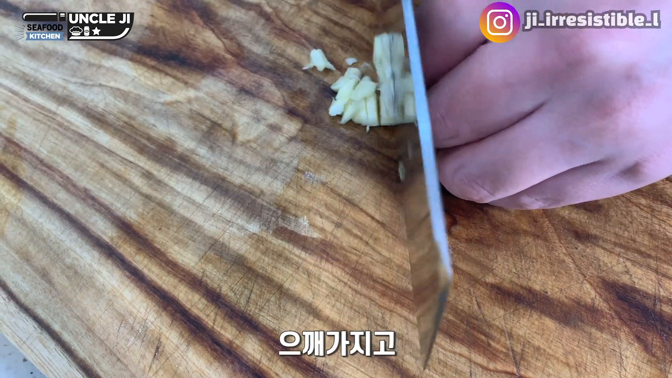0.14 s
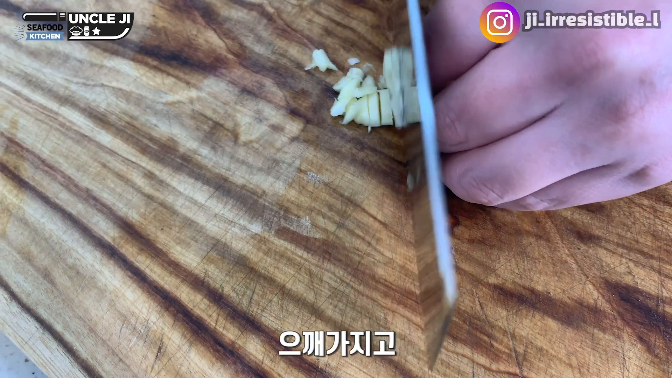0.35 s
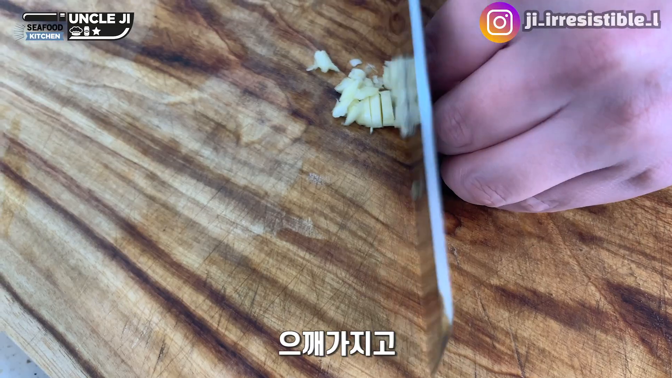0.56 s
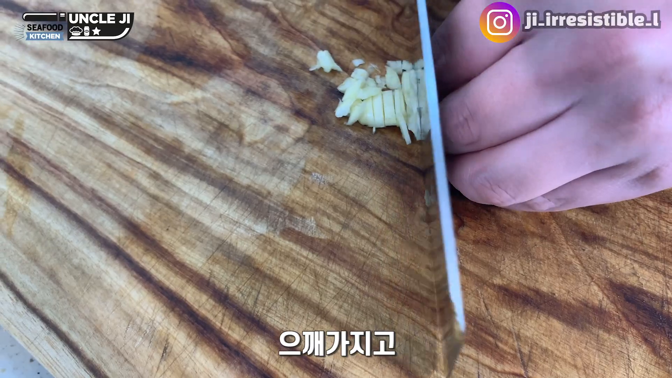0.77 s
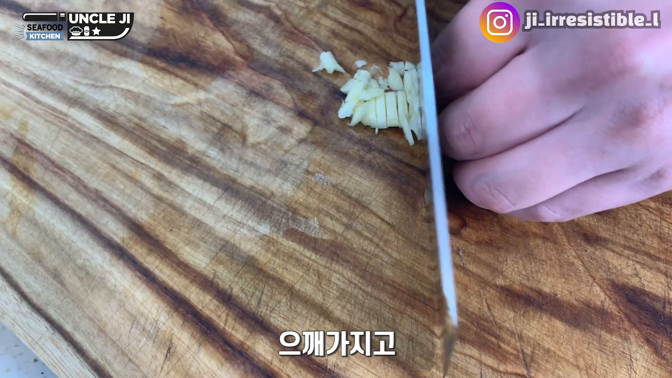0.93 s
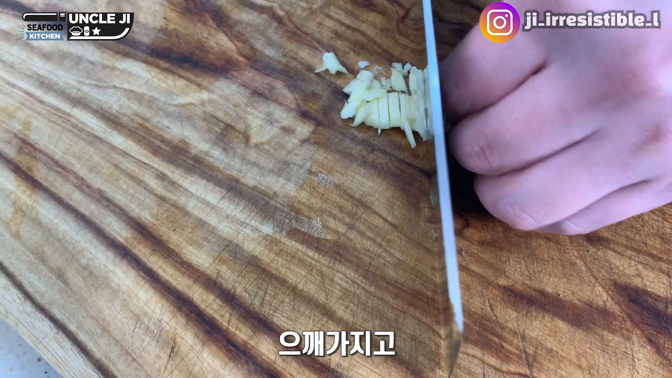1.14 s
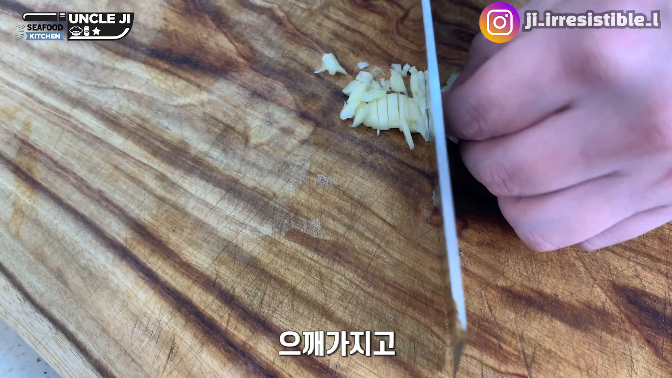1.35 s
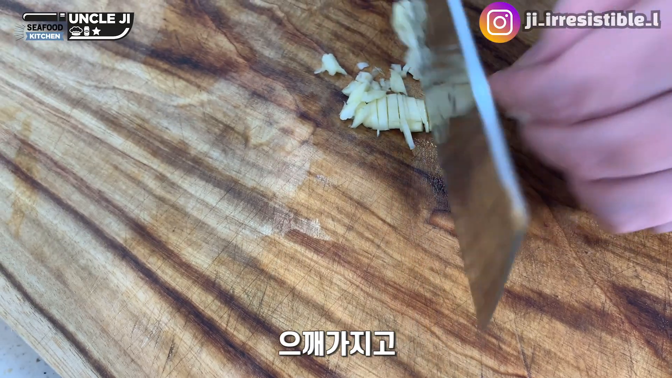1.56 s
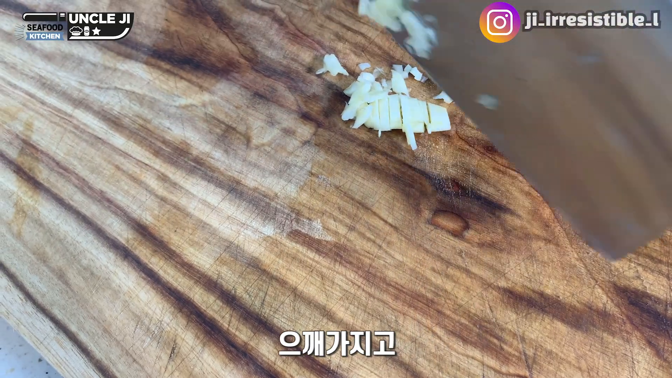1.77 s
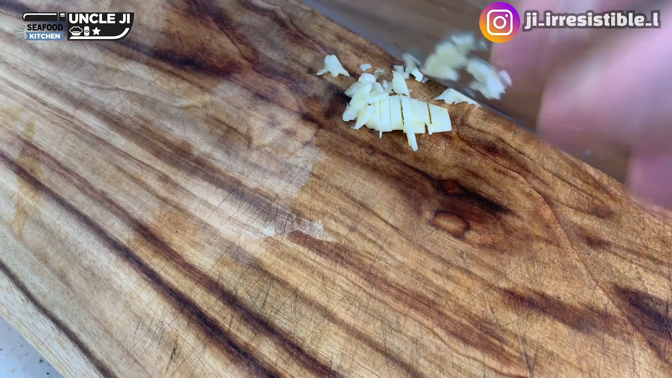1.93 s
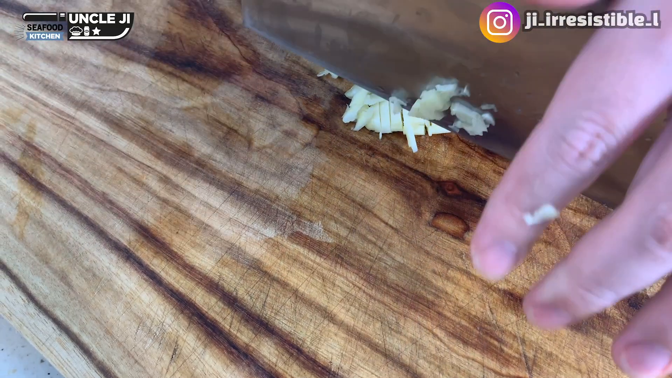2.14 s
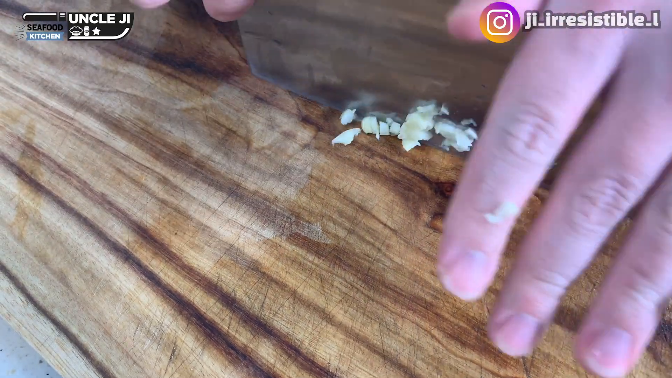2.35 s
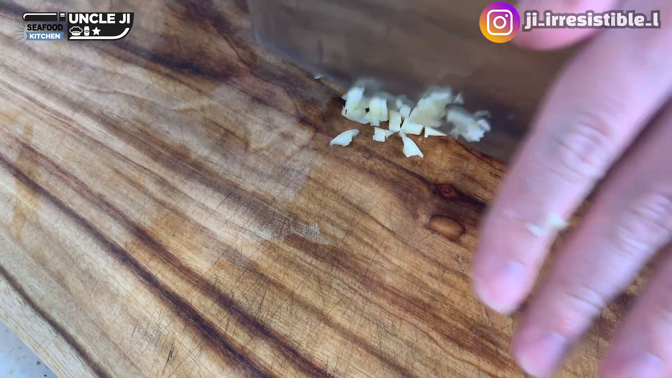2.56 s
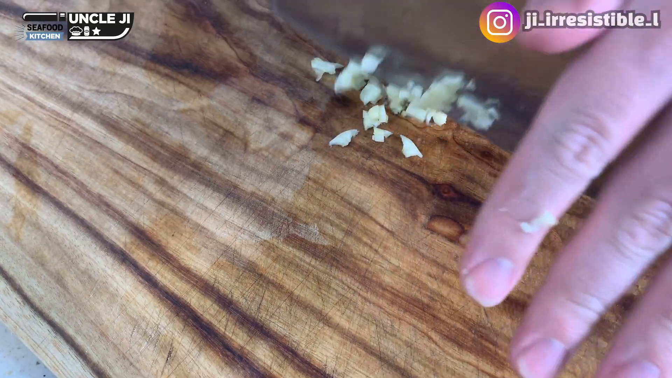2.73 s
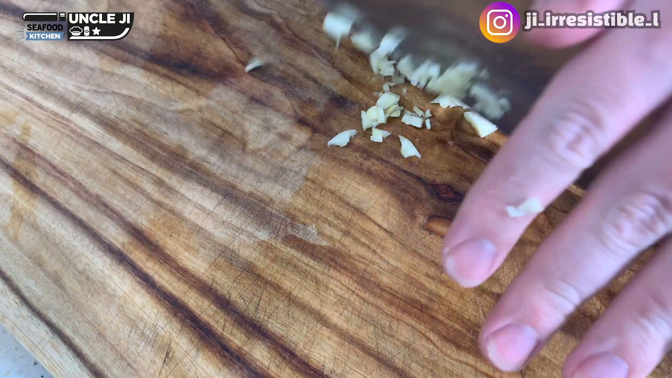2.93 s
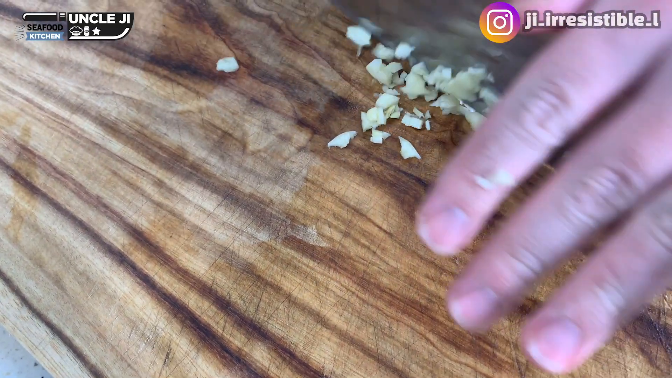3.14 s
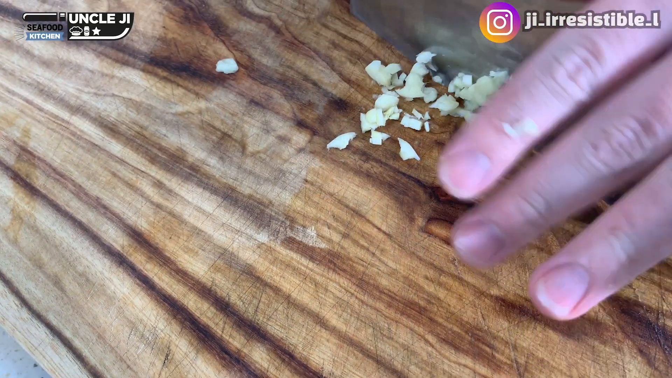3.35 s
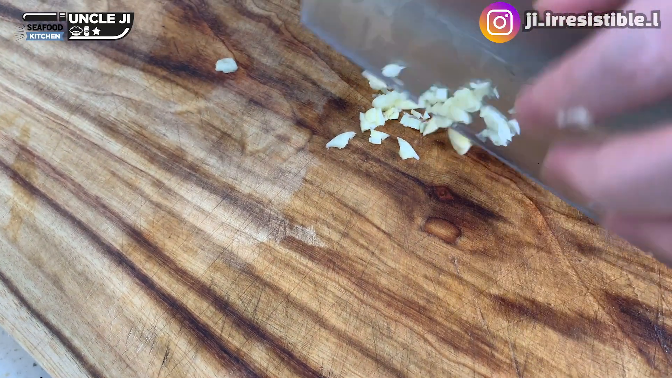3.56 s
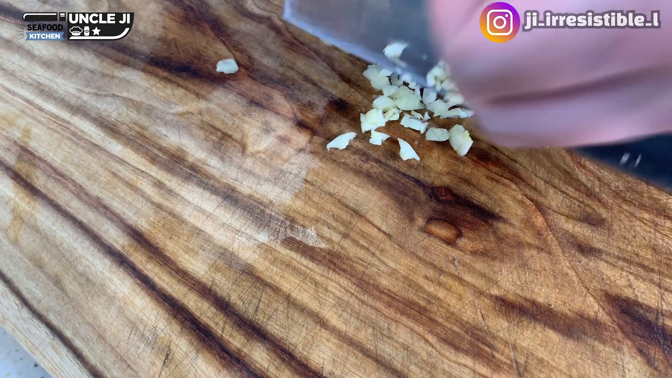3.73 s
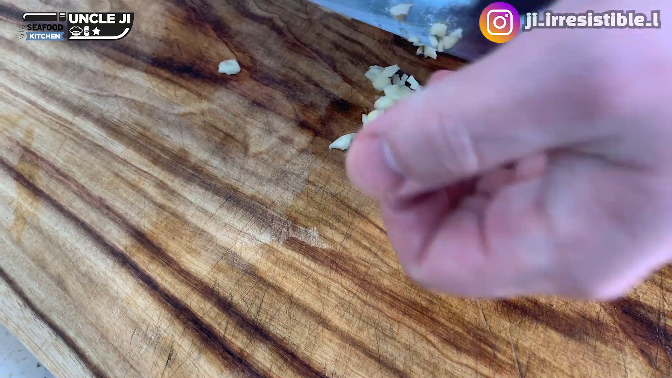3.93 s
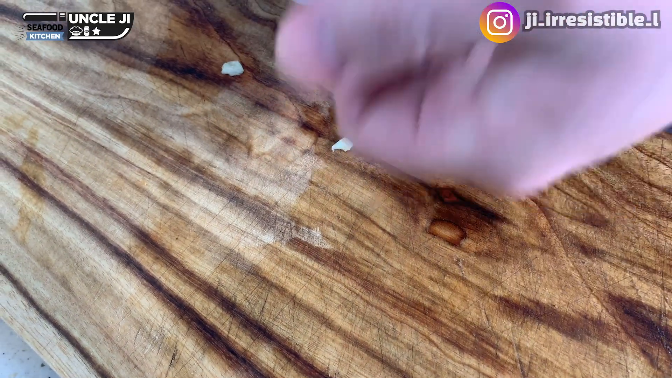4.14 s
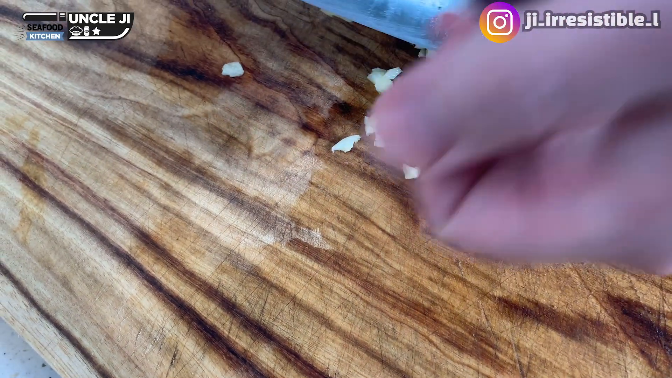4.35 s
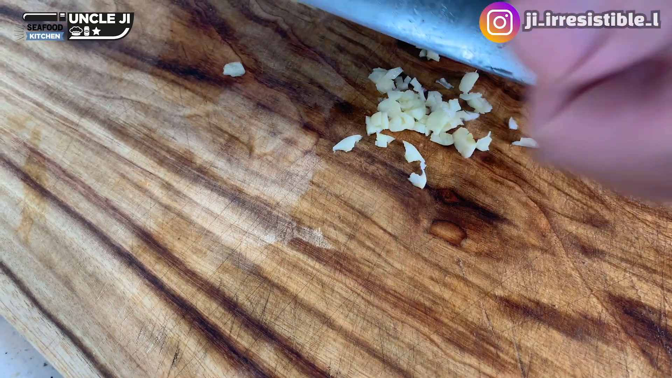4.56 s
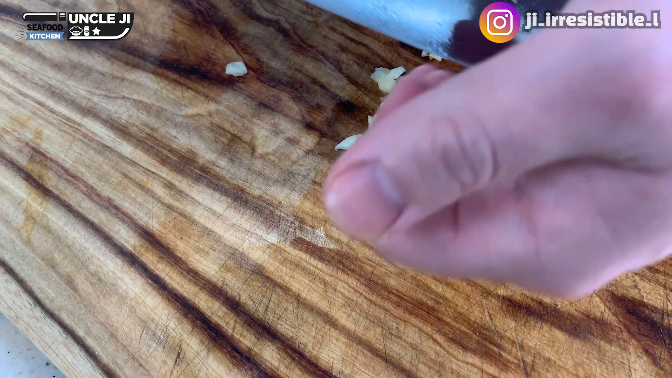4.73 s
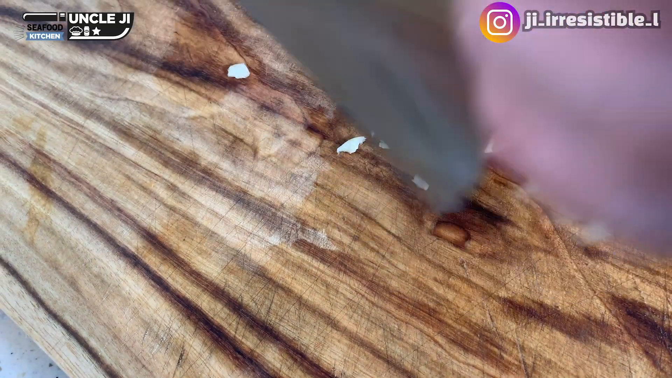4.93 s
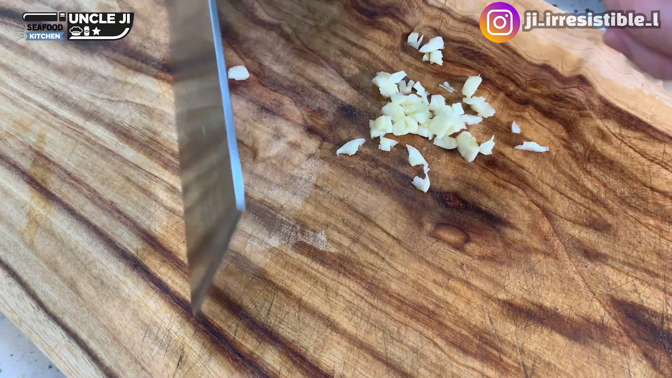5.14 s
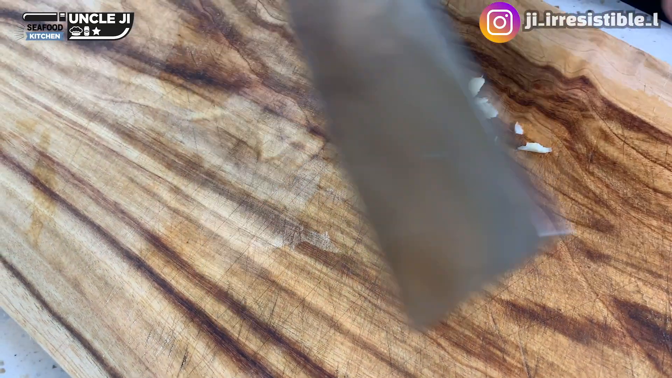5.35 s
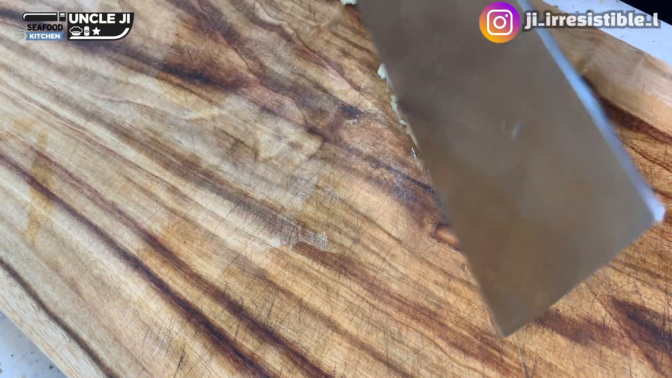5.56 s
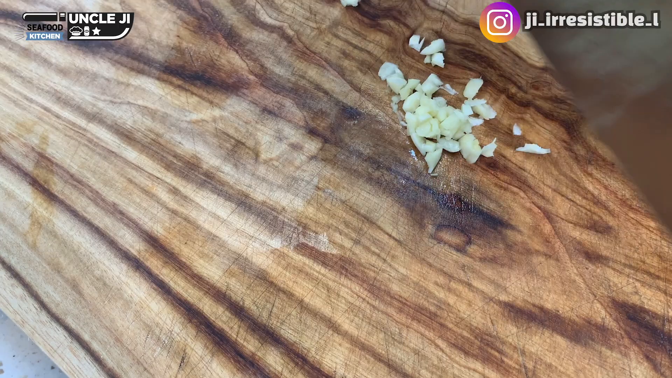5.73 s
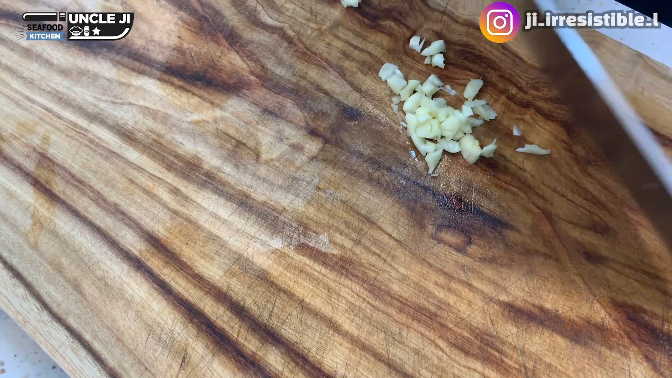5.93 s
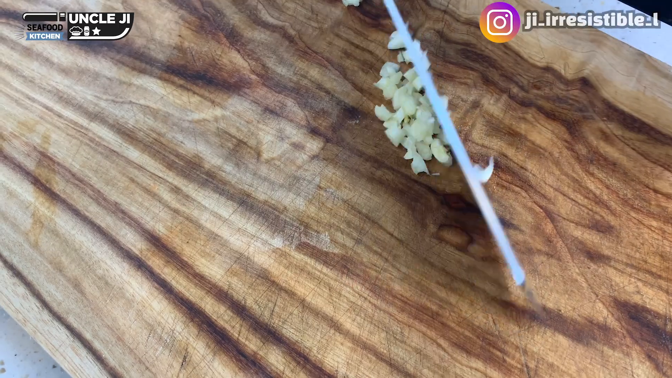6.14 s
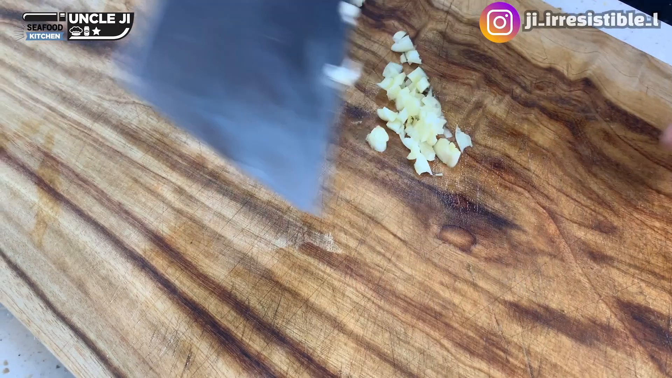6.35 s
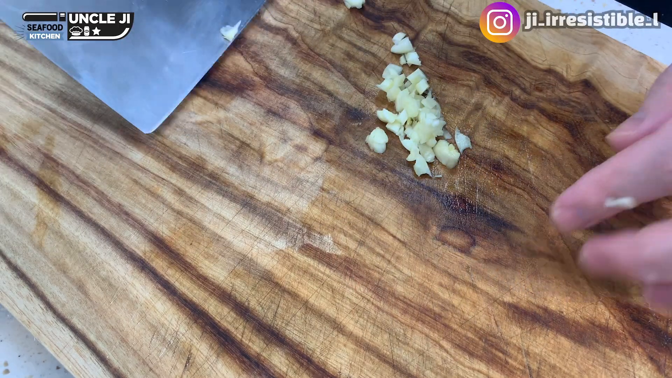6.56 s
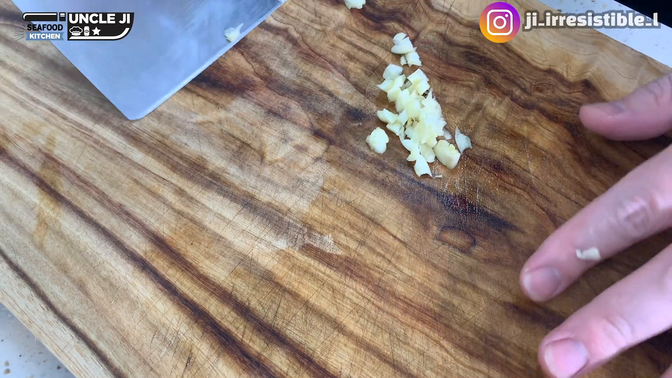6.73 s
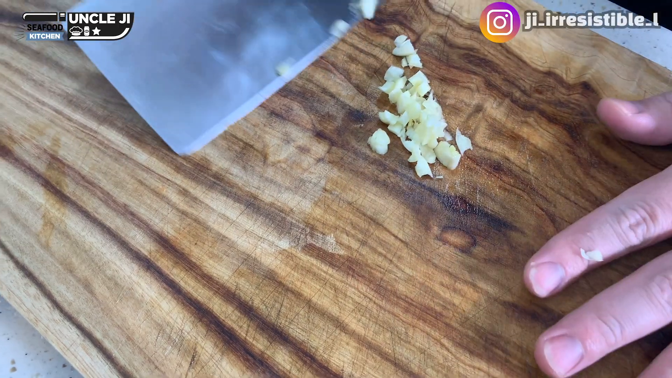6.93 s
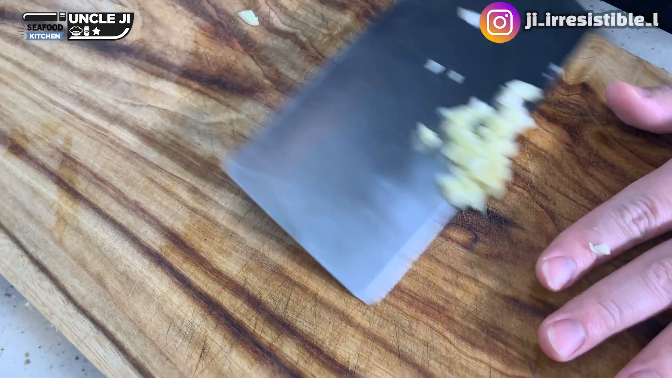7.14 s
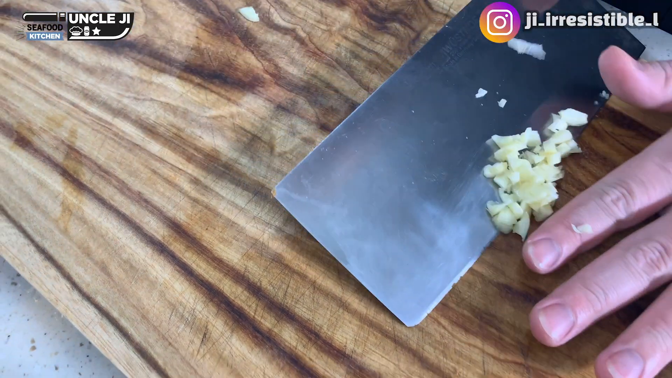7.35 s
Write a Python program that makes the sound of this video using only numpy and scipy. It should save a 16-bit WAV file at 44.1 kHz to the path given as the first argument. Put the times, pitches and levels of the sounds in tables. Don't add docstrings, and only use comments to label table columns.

```python
import sys
import numpy as np
from scipy import signal
from scipy.fft import rfft, irfft, next_fast_len
from scipy.io import wavfile
from scipy.ndimage import uniform_filter1d, map_coordinates

SR = 44100
rng = np.random.default_rng(int(sys.argv[2]) if len(sys.argv) > 2 else 0)


def bounce(signal):
    frames = np.transpose(np.atleast_2d(signal))
    limited = np.clip(frames, -1, 1)
    pcm = np.round(limited * 32767).astype(np.int16)
    wavfile.write(sys.argv[1], SR, pcm)


def boost_factor(decibels):
    exponent = np.asarray(decibels, float) / 20
    return 10 ** exponent


N = 330155
TIME_S = np.arange(N) / SR


def unit(x):
    return x / np.sqrt(np.mean(x ** 2) + 1e-20)


def along(points, hz):
    table = np.transpose(points)
    return np.interp(np.log(hz + 1), np.log(table[0] + 1), table[1])


def wobble(rate_hz):
    knots = rng.standard_normal(int(N * rate_hz / SR) + 4)
    return map_coordinates(knots, [np.arange(N) * rate_hz / SR])


def filtered(x, response):
    size = next_fast_len(len(x) + 8192)
    return irfft(rfft(x, size) * response(np.fft.rfftfreq(size, 1 / SR)), size)[:len(x)]


def coloured(x, curve):
    return filtered(x, lambda f: boost_factor(along(curve, f)))


def resonance(hz, width_hz):
    return lambda f: 1j * f * width_hz / (hz * hz - f * f + 1j * f * width_hz)


def add(track, start_s, sound):
    at = round(start_s * SR)
    part = track[max(at, 0):at + len(sound)]
    part += sound[max(-at, 0):][:len(part)]


def ramp(x):
    return np.sin(np.pi / 2 * np.minimum(x, 1)) ** 2


def ring(modes, t, spread_db):
    total = 0
    for k, (hz, db, t60_s) in enumerate(modes):
        decay = boost_factor(db + spread_db * rng.standard_normal() - 60 * t / t60_s)
        total = total + (-1) ** k * decay * np.sin(2 * np.pi * hz * t)
    return total


def grains(lump_db):
    return unit(rng.standard_normal(N) * boost_factor(lump_db * rng.exponential(size=N)))


# (frequency [Hz], t60 [s])
ROOM_T60 = [(60, 0.41), (160, 0.6), (420, 0.61), (1100, 0.47), (2000, 0.53), (3000, 0.41), (7700, 0.6),
            (16000, 0.15)]


def tail(colour):
    hz, t, z = signal.stft(rng.standard_normal(SR * 3 // 4), SR, nperseg=512)
    z = z * boost_factor(-60 * t / along(ROOM_T60, hz)[:, None])
    answer = coloured(signal.istft(z, SR, nperseg=512)[1], colour)
    answer_s = np.arange(len(answer)) / SR
    answer = answer * (1 - np.exp(-(answer_s / .009) ** 2))
    return answer / np.linalg.norm(answer)


# (frequency [Hz], density [dB per Hz])
AIR_SPECTRUM = [(15, -32.5), (25, -11), (53, 2.5), (76, -12.5), (92, -1.5), (124, -9.5), (154, 4.5),
                (176, -8), (719, -15), (823, -15), (1340, -23), (1490, -26.5), (2370, -24), (14900, -54),
                (16200, -49)]
# (frequency [Hz], level [dB rms])
FRIDGE_LINES = [(48.4, -69.5), (150.7, -71.5), (613.7, -83.5), (710.6, -76.5), (1303, -80.5), (1405, -85),
                (1604, -90), (2320, -85)]


def fridge():
    noise = rng.standard_normal(N)
    air = boost_factor(-58.5 + .8 * wobble(3)) * unit(coloured(noise, AIR_SPECTRUM))
    hum = np.zeros(N)
    for hz, db in FRIDGE_LINES:
        level = boost_factor(db + 3 + 2 * wobble(6))
        hum += level * np.sin(2 * np.pi * hz * TIME_S + 1.5 * wobble(4))
    whine = boost_factor(-84) * unit(filtered(rng.standard_normal(N), resonance(2340, 30)))
    return air + hum + whine


# (time [s], peak [dB], pitch [Hz])
SNAPS = [(0.1439, -20, 8000), (1.468, -48, 5030), (2.7907, -42, 6930), (3.224, -58, 9240),
         (3.344, -50.5, 3200), (4.116, -54.5, 8950), (4.446, -49.5, 3400), (4.572, -42, 1394),
         (5.126, -39, 5060), (5.439, -48, 8220)]


def ticks():
    out, t = np.zeros(N), np.arange(SR // 50) / SR
    for start_s, db, hz in SNAPS:
        add(out, start_s, boost_factor(db) * np.sin(2 * np.pi * hz * t) * np.exp(-t * hz / 0.78))
    return out


# (time [s], pressure [dB], speed [dB], blade mode nearest the contact [Hz])
DRAGS = [
    [(5.15, -46.5, -58, 1300), (5.188, -35.5, -43, 1610), (5.234, -27, -38.5, 1740),
     (5.256, -39, -37.5, 1620), (5.294, -36.5, -38, 1870), (5.322, -32.5, -45.5, 1360),
     (5.342, -34, -45.5, 1315), (5.398, -51, -64, 1280), (5.44, -56.5, -69, 1560)],
    [(5.82, -40.5, -52.5, 1500), (5.85, -39, -44, 1940), (5.902, -40, -37.5, 2030), (5.91, -36, -37, 1890),
     (5.964, -33.5, -41, 1820), (5.986, -43.5, -51, 1720), (6.03, -57, -64, 1680)],
    [(6.76, -47.5, -57.5, 1550), (6.782, -41.5, -55.5, 1510), (6.854, -40, -52.5, 1530),
     (6.908, -41, -59, 1440), (6.934, -34, -55, 1460), (7.004, -43.5, -53, 1470), (7.044, -35.5, -53, 1580),
     (7.126, -43.5, -57, 1410), (7.2, -62.5, -75, 1560)],
]
# (board rumble [dB], favoured board mode [Hz], favoured edge mode [Hz], hiss [dB])
DRAG_LEAN = [
    (3.5, 130, 3300, -0.5),
    (-4, 87, 3380, 1),
    (-2, 210, 3400, -4),
]
# (frequency [Hz], width [Hz], level [dB])
BLADE_MODES = [(560, 45, -8), (680, 45, -3), (880, 40, -4), (1080, 40, -7), (1300, 35, -2), (1460, 40, -2),
               (1650, 35, -1), (1830, 30, -3), (2000, 45, -7), (2220, 45, -8)]
EDGE_MODES = [(2470, 150, 4.5), (2950, 93, 11.5), (3200, 120, 8), (3510, 80, 3), (3800, 59, 4),
              (4420, 110, -4), (4870, 670, -19)]
WOOD_MODES = [(175, 12, 5.5), (335, 50, -12.5), (405.2, 60, 2)]
# (frequency [Hz], density [dB per Hz])
HISS_SPECTRUM = [(3000, -24), (4800, -2), (5600, -5), (6900, 0), (8400, -9), (10000, -14), (12000, -11),
                 (14900, -6), (16200, -12)]
HISS_DB, HISS_GROWS = -44.5, 1.1
RUMBLE_DB, RUMBLE_FADES = -9.5, .5
WOOD_FOLLOWS = 2.2
RASP_DB, GRIT_DB = -6.5, -8.5


def scrapes():
    fade = np.array([.06, -40, -40, 0])
    rows, starts_s = [], []
    for stroke in map(np.array, DRAGS):
        rows += [stroke[0] + fade * [-1, 1, 1, 0], stroke, stroke[-1] + fade]
        starts_s.append(stroke[0][0] - fade[0])
    rows = np.vstack(rows)
    press_db, speed_db, blade_hz = [np.interp(TIME_S, rows[:, 0], c) for c in rows[:, 1:].T]
    stroke_now = np.maximum(np.searchsorted(starts_s, TIME_S) - 1, 0)
    lean_db, lean_hz, edge_hz, shine_db = np.array(DRAG_LEAN)[stroke_now].T
    fast_db = speed_db + 40
    wood_hz = np.clip(lean_hz * (blade_hz / 1450) ** WOOD_FOLLOWS, 170, 420)
    rub = grains(lump_db=1.2) * boost_factor(1.5 * wobble(60))

    def mode(hz, width_hz):
        sharp, broad = resonance(hz, .7 * width_hz), resonance(hz, .7 * hz)
        return filtered(rub, lambda f: sharp(f) * broad(f))

    def sing(modes, peak_hz, reach):
        total = np.zeros(N)
        for hz, width_hz, db in modes:
            near_db = 8.5 * np.exp(-(np.log(hz / peak_hz) / reach) ** 2) + 3.5 * wobble(13)
            total += boost_factor(db) * boost_factor(near_db) * mode(hz, width_hz)
        return total / np.sqrt(np.abs(uniform_filter1d(total * total, SR // 10)) + 1e-12)

    def scratch(hz, width_hz):
        return unit(filtered(rub, lambda f: resonance(hz, width_hz)(f) ** 2))

    blade = boost_factor(press_db - 2.5) * sing(BLADE_MODES, blade_hz, reach=.07)
    edge = boost_factor(speed_db - 0.95) * sing(EDGE_MODES, edge_hz, reach=.12)
    rumble_db = press_db + RUMBLE_DB + lean_db - RUMBLE_FADES * np.maximum(fast_db, -15)
    board = boost_factor(rumble_db) * sing(WOOD_MODES, wood_hz, reach=0.67)
    hiss = boost_factor(HISS_DB + shine_db + HISS_GROWS * fast_db) * unit(coloured(rub, HISS_SPECTRUM))
    rasp = boost_factor(press_db + RASP_DB) * scratch(950, 960)
    grit = boost_factor(speed_db + GRIT_DB) * scratch(3542, 1700)
    return blade + edge + board + hiss + rasp + grit


# (start [s], length [s], level [dB], loudest moment [0-1], counter shake [dB])
ROCKING_CUTS = [
    (2.201, 0.043, -43, 0.08, -41),
    (2.5, 0.032, -42, 0.08, -38),
    (2.739, .036, -42, 0.87, -38.5),
    (2.802, 0.0112, -54, 0.1, -45),
    (2.988, 0.029, -43.5, .05, -36.5),
    (3.233, .032, -44.5, 0.7, -35.5),
    (3.456, 0.016, -57, 0.63, -53),
]
# (frequency [Hz], density [dB per Hz])
ROCKING_CRUNCH = [(180, -32), (300, 4.5), (949, 2.5), (1880, -8), (2860, -12), (3670, -14), (5570, -23),
                  (7770, -25.5), (9980, -31), (14700, -18.5), (16200, -34.5)]
CHOP_CRUNCH = [(1650, -44), (2800, -6.5), (3410, 6), (4260, -12.5), (8120, -12.5), (9550, -26),
               (15100, -12.5), (16200, -22.5)]
BITE_DB, BITE_TOP, BITE_SHAKE_DB = -39.5, .15, -40.5


def cuts():
    t = np.arange(SR // 4) / SR
    fast, slow, shake = np.zeros(N), np.zeros(N), np.zeros(N)
    bites = [(s - lead_s, lead_s, BITE_DB + db, BITE_TOP, BITE_SHAKE_DB + db)
             for s, db, _, lead_s in CHOP_BLOWS]
    swing = np.sin(2 * np.pi * 37 * t) + 0.2 * np.sin(2 * np.pi * 92 * t)
    rock = swing * (t / 0.041) * np.exp(1 - (t / 0.053) ** 2)
    for start_s, length_s, db, top, shake_db in bites + ROCKING_CUTS:
        top = np.clip(top, .02, .95)
        progress = [0, top / 2, top, (top + 1) / 2, 1.15, 3]
        push = boost_factor(db) * np.interp(t / length_s, progress, [0.11, 0.56, 1.1, .9, 0.14, 0.015])
        add(fast if start_s < 2 else slow, start_s, push)
        spot = boost_factor(1.2 * rng.standard_normal())
        thud = np.sin(2 * np.pi * 185 * spot * t) + .4 * np.sin(2 * np.pi * 470 * spot * t)
        thud = thud * boost_factor(-60 * t / 0.13) * (1 - np.exp(-t / 0.0022))
        add(shake, start_s + length_s - .008, boost_factor(shake_db) * rock + boost_factor(db + 0.5) * thud)

    def rocking_colour(f):
        gap = 1 + 3 * np.abs(resonance(3450, 750)(f)) ** 2
        return boost_factor(along(ROCKING_CRUNCH, f)) * gap

    burst = grains(lump_db=2) * boost_factor(2.2 * wobble(150))
    chop_crunch = fast * unit(coloured(burst, CHOP_CRUNCH))
    return chop_crunch + slow * unit(filtered(burst, rocking_colour)), shake


# (frequency [Hz], level [dB], t60 [s])
BOARD_MODES = [(80, -4, .18), (115, -9, .1), (158, -1, .14), (270, 0, .035), (382, -7, .15),
               (490, -1, .045), (555, -4, .07), (870, -10, .05)]
STEEL_MODES = [(930, -2, .07), (1560, 0, .08), (2100, -4, .06), (2550, -6, .05), (3330, -6, .16),
               (3850, -13, .07), (4300, -13, .07), (5000, -13, .03), (6100, -19, .08), (8100, -28, .05)]
# (frequency [Hz], width [Hz], level [dB])
SLAP_BANDS = [(1300, 580, 1), (2100, 900, 0.5), (3400, 890, 0.5), (6260, 830, -32), (15330, 3000, -39.5)]
# (delay [s], level [dB])
WALL_ECHOES = [(.0079, -11), (.0112, -17), (.0195, -14), (.0283, -13), (.031, -15)]
THUMP_HZ, THUMP_T60_S, THUMP_DB = 508, 0.019, -2


def knock(out, room, colour, start_s, db, hz, boom_db, slap_db, room_db, steel_db, slap_t60_s):
    t = np.arange(SR // 2) / SR
    contact_s = min(4.3 / hz, .009)
    u = np.minimum(t / contact_s, 1)
    turns = hz * contact_s * u * (1.5 - .56 * u)
    bend = ramp(u / .2) * ramp((1 - u) / .22) * np.sin(2 * np.pi * turns) * .9
    reached = [(f, g - 9 * np.log10(1 + (f / hz) ** 2), t60_s) for f, g, t60_s in BOARD_MODES]
    onset = ramp(t / .004)
    boom = boost_factor(boom_db) * ring(reached, t, spread_db=1) * onset

    def slap_colour(f):
        bands = sum(boost_factor(g + 21.0) * resonance(c, w)(f) ** 2 for c, w, g in SLAP_BANDS)
        return bands / (1 + 1j * f / (3 * hz)) ** 2

    puff = boost_factor(-60 * t / slap_t60_s) * rng.standard_normal(len(t)) * (1 - np.exp(-t / .0003))
    slap = boost_factor(slap_db) * filtered(puff, slap_colour)
    steel = boost_factor(steel_db) * ring(STEEL_MODES, t, spread_db=2) * onset
    steel = steel * boost_factor(4 * wobble(200)[:len(t)])
    late_s = np.maximum(t - 0.71 * contact_s, 0)
    thump = boost_factor(THUMP_DB - 60 * late_s / THUMP_T60_S) * np.sin(2 * np.pi * THUMP_HZ * late_s)
    add(out, start_s, boost_factor(db) * (bend + thump + boom + slap + steel))
    for delay_s, wall_db in WALL_ECHOES:
        add(out, start_s + delay_s, -boost_factor(db + wall_db + room_db - 3) * bend)
    echo = room + .5 * tail(colour)
    soft = lambda f: 1 / (1 + 1j * f / (0.66 * hz))
    add(out, start_s, boost_factor(db + room_db + 18.5) * filtered(echo, soft))


# (time [s], peak [dB], bending pitch [Hz], crunch through the clove before [s])
CHOP_BLOWS = [
    (-.062, 0, 1220, .012),
    (0.118, -2, 1274, 0.01),
    (0.2989, -2, 1167, .011),
    (.4920, -1.5, 1205, 0.0078),
    (0.6687, -3, 1128, .016),
    (0.8337, -3, 1165, 0.0065),
    (1.0078, -4.5, 1127, .012),
    (1.2093, -9, 840, 0.018),
]
# (time [s], peak [dB], bending pitch [Hz], board boom [dB], steel [dB])
LAY_BLOWS = [
    (1.9618, -21.5, 268, -1, -30.5),
    (5.1065, -13.5, 402, -6, -25.5),
    (5.7469, -14.5, 817, -3, -33),
    (6.5156, -32, 1496, -3.5, -2.5),
]
# (frequency [Hz], density [dB per Hz])
CHOP_ROOM = [(35, -34), (60, -7), (269, -10), (670, -7.5), (736, -7.5), (808, -10.5), (867, -8), (1020, 0),
             (1120, -5), (1490, -4), (2210, -17.5), (2930, -16.5), (9910, -55), (15100, -59), (16200, -70)]
LAY_ROOM = [(35, -24), (60, 4.5), (518, -3), (670, -3.5), (998, 0.5), (1790, -7.5), (2210, -10.5),
            (3970, -16), (10600, -34), (14800, -40), (16200, -65.5)]
CHOP_BOOM_DB, CHOP_SLAP_DB, CHOP_ROOM_DB = -15.5, -21, -4
SOFT_SHARE = 0.53
LAY_SLAP_DB, SLAP_DB_PER_OCTAVE, LAY_ROOM_DB = -11.5, 2.5, -9
CHOP_SLAP_T60_S, LAY_SLAP_T60_S = 0.0099, 0.036


def knocks():
    out, room = np.zeros(N), tail(CHOP_ROOM)
    for start_s, db, hz, _ in CHOP_BLOWS:
        lift_db = -SOFT_SHARE * db
        knock(out, room, CHOP_ROOM, start_s, db, hz, CHOP_BOOM_DB + lift_db, CHOP_SLAP_DB + lift_db,
              CHOP_ROOM_DB + lift_db, -90, CHOP_SLAP_T60_S)
    for start_s, db, hz, boom_db, steel_db in LAY_BLOWS:
        slap_db = LAY_SLAP_DB + SLAP_DB_PER_OCTAVE * np.log2(hz / 1000)
        knock(out, 4 * tail(LAY_ROOM), LAY_ROOM, start_s, db, hz, boom_db, slap_db,
              LAY_ROOM_DB, steel_db, LAY_SLAP_T60_S)
    return out


# (frequency [Hz], level [dB])
LIGHT_ROOM = [(100, 3.5), (1500, -0.5), (3500, -5.5), (7000, -7), (16000, -12)]


def scene():
    crunch, shake = cuts()
    light = crunch + scrapes() + ticks()
    wet = boost_factor(-16.5) * signal.fftconvolve(light, tail(LIGHT_ROOM))[:N]
    return (knocks() + light + wet + shake + fridge())[None]


def band_limit(x):
    return signal.sosfilt(signal.butter(12, 16650, fs=SR, output="sos"), x)


# (frequency [Hz], gain [dB])
TREBLE_SHAPE = [(11000, 0), (12800, 0), (14000, -0.5), (15600, 0.5), (16200, 5.5), (16400, -70.5)]


def record(dry):
    top = .67
    rounded = dry[0] / (1 + np.abs(dry[0] / top) ** 4) ** (1 / 4)
    return band_limit(coloured(rounded, TREBLE_SHAPE)[None])


dry = scene()
out = record(dry)
bounce(out)
```